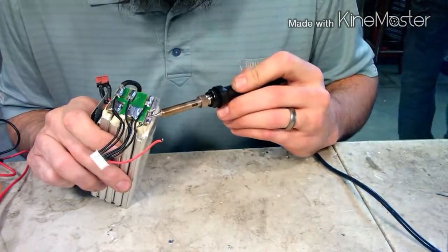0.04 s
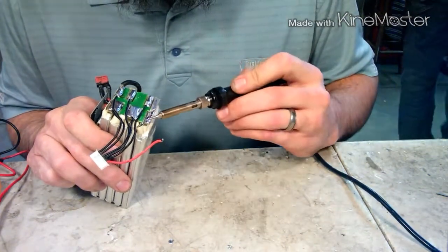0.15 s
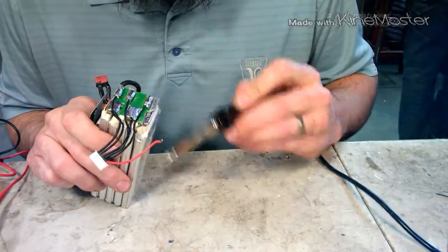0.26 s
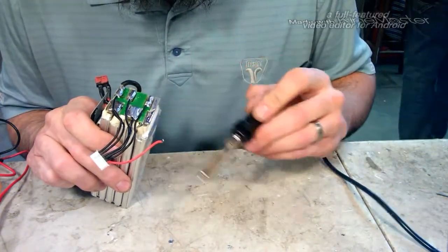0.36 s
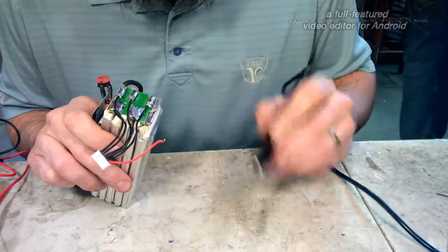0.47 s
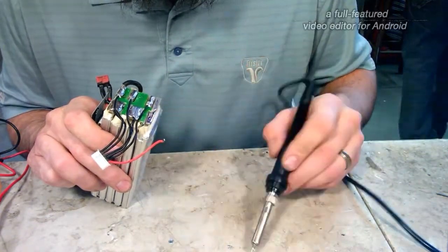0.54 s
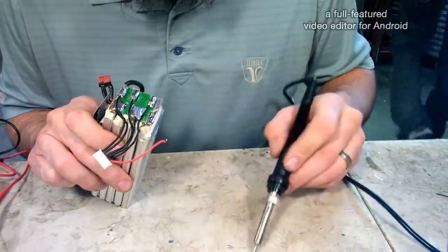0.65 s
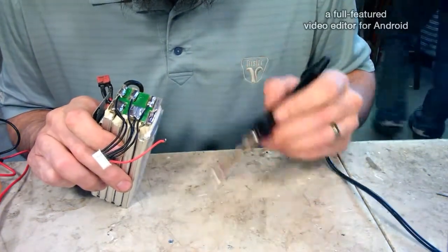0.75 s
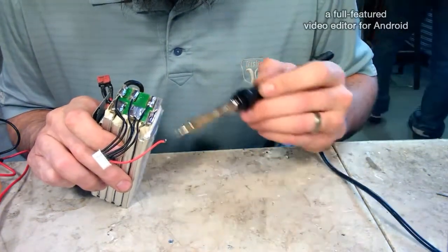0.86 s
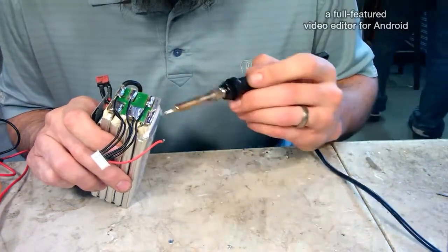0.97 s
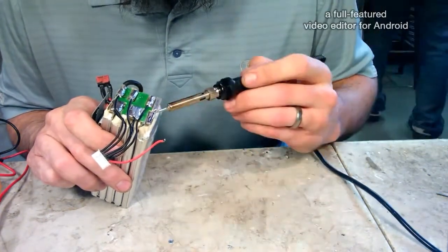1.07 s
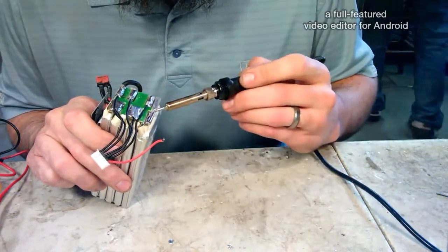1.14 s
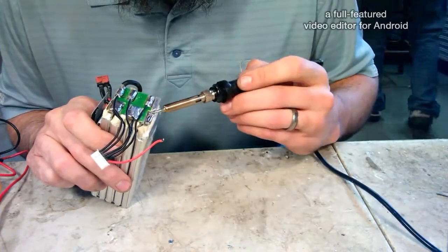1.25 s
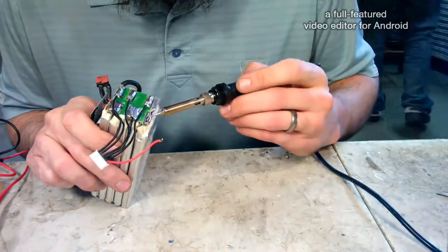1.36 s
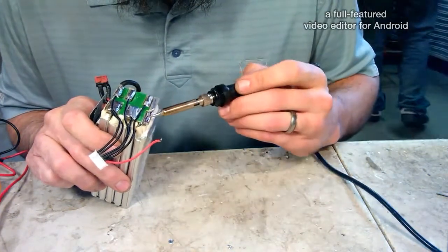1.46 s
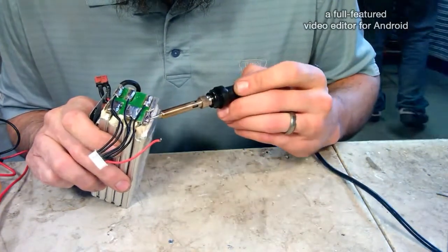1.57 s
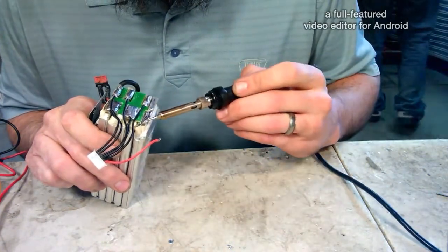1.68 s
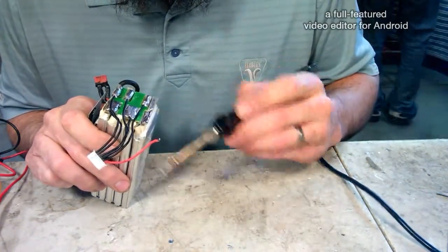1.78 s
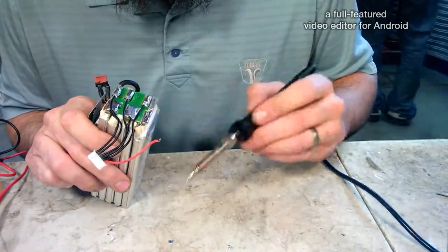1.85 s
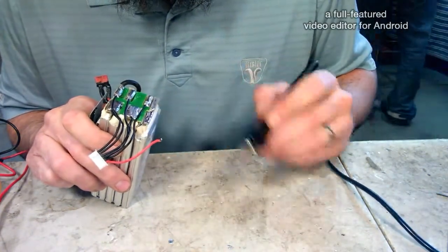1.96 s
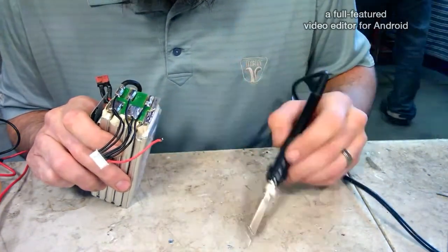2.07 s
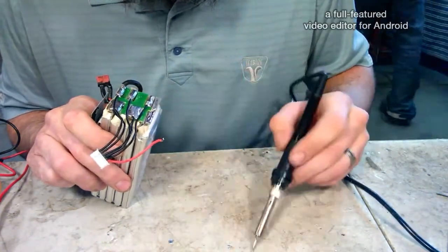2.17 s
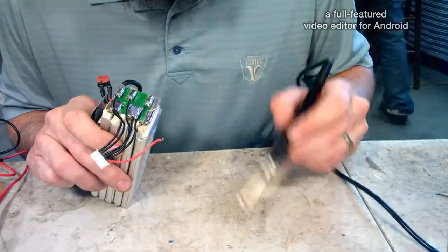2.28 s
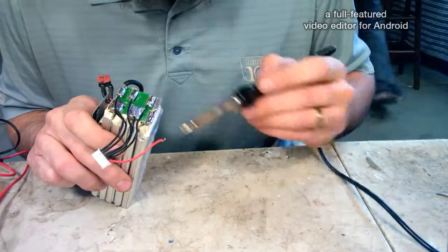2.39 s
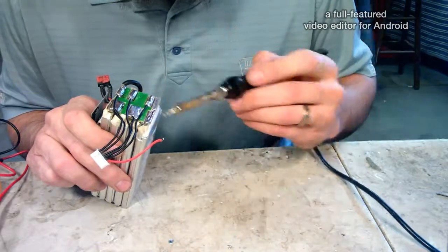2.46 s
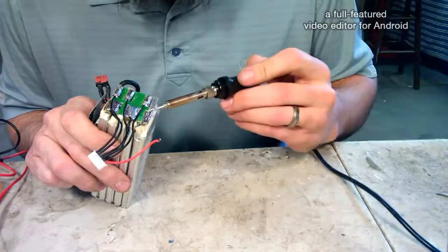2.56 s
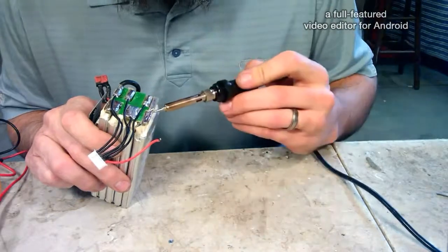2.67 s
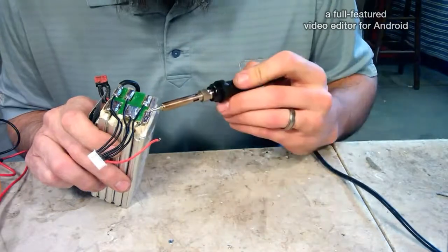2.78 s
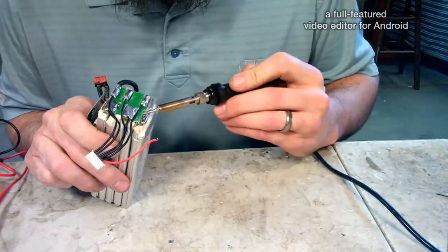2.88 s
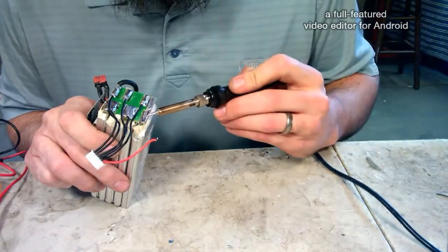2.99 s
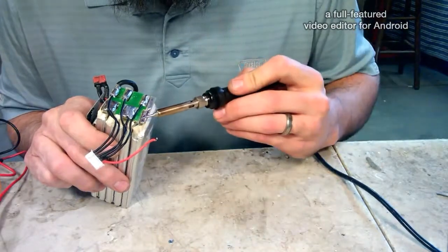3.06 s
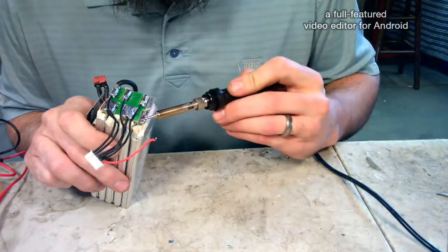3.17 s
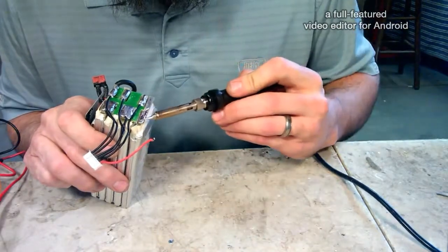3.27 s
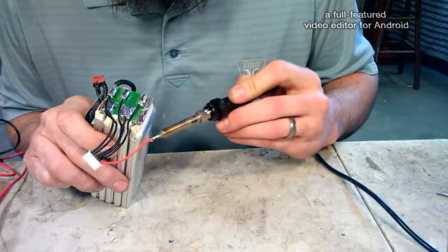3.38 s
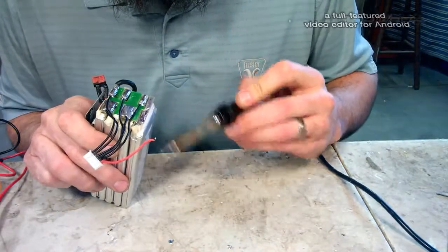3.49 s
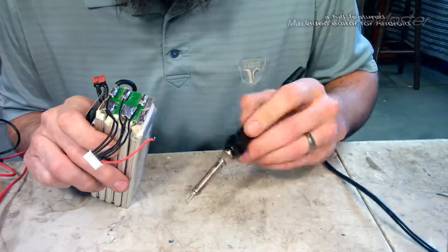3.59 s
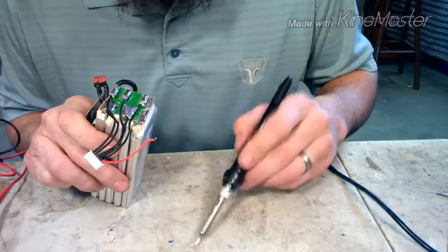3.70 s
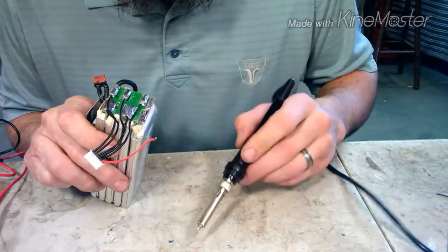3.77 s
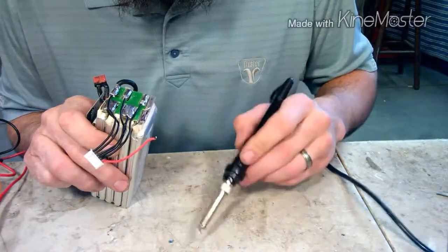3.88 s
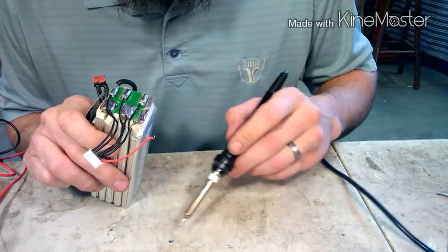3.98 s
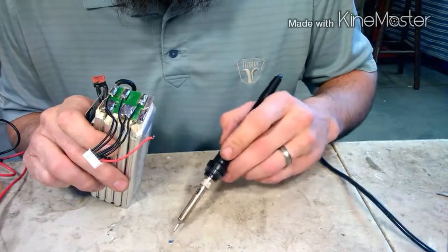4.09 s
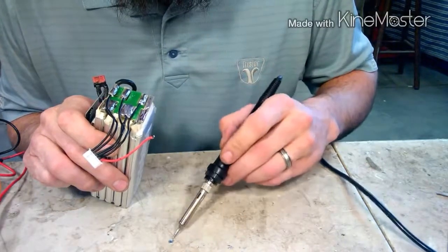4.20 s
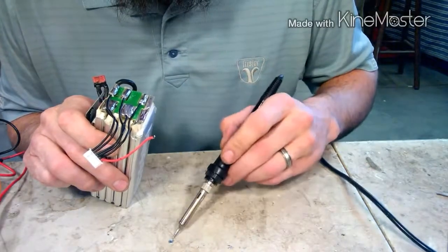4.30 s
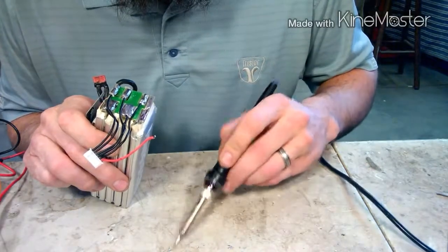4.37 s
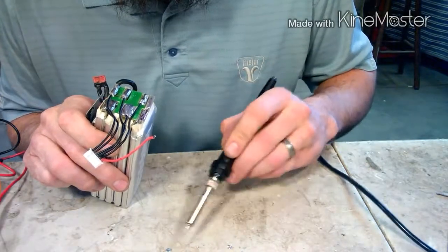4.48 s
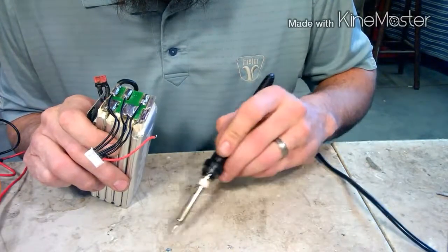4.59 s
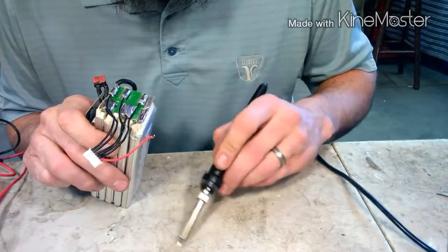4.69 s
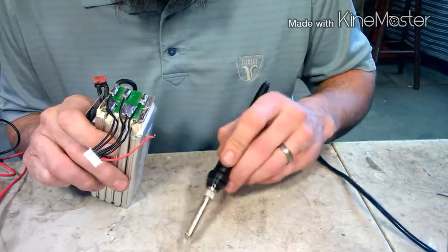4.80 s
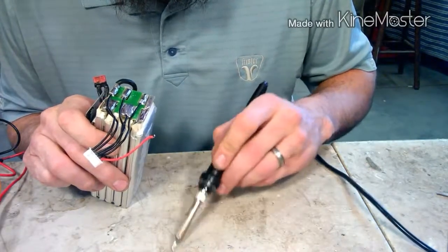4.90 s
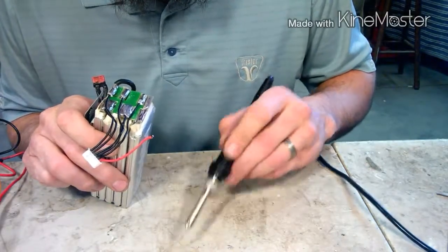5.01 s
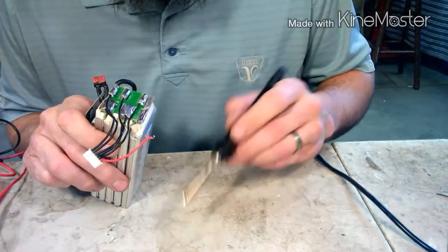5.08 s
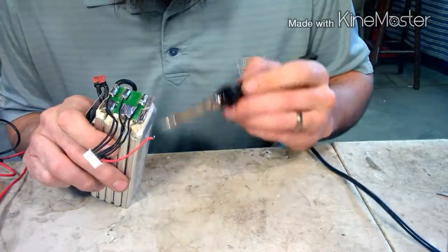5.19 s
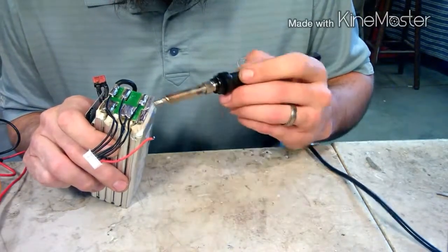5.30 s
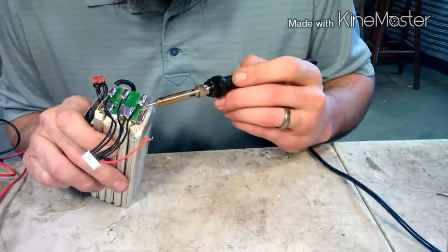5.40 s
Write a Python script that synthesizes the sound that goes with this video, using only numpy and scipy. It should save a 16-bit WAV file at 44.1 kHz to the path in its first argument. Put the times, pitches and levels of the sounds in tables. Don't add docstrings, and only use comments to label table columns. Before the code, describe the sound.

A soldering iron is knocked on a wooden bench close to a phone. A sharp double clack comes first, then after a pause a rapid run of hard raps, a faint tick, another loud cluster, and finally smaller knocks and scuffs. Low ventilation rumble with soft hiss fills a small, dry workshop, ducking briefly after the loudest hits.

```python
import sys
import numpy as np
from scipy import signal
from scipy.fft import rfft, irfft, next_fast_len
from scipy.io import wavfile
from scipy.ndimage import uniform_filter1d, map_coordinates

SR = 44100
rng = np.random.default_rng(int(sys.argv[2]) if len(sys.argv) > 2 else 0)


def transcribe(u):
    v = np.clip(np.atleast_2d(u).T, -1, 1)
    q = np.round(v * 32767).astype(np.int16)
    wavfile.write(sys.argv[1], SR, q)


def elevation(decibels):
    levels = np.asarray(decibels, float)
    return 10 ** (levels / 20)


N = 240256

# (frequency [Hz], density [dB per Hz])
AIR_SPECTRUM = [(25, -14), (50, -10), (85, 2.5), (180, -3.5), (300, -0.5), (400, -7), (520, -10.5),
                (900, -16), (1400, -24.5), (2000, -27.5), (3500, -31.5), (5500, -34), (9000, -35.5),
                (15000, -44)]
# (frequency [Hz], level [dB])
AIR_FAR_LEVEL = [(40, -10), (150, -8), (300, -10.5), (600, -4), (1200, -3), (2650, -.6), (5300, -.8),
                 (9000, -10.5), (15000, -16)]
# (frequency [Hz], signed likeness [-1 to 1])
AIR_COHERENCE = [(30, 0.79), (70, 0.49), (150, 0.84), (300, 0.39), (600, 0.99), (1200, 0.35), (1900, -0.22),
                 (2650, 0.28), (3600, 0.15), (5300, -0.22), (7000, 0.13)]
# (frequency [Hz], phase [rad])
AIR_PHASE_LEAD = [(45, 1), (120, 0.6), (300, -1.5), (600, -0.86)]
# (frequency [Hz], width [Hz], level [dB])
DUCT_DRONE = (178, 30.5, 0)
# (frequency [Hz], width [Hz], level [dB])
BENCH_HOLLOW = [(321.6, 5.5, 9.5), (520, 50, -3.5), (900, 73, -1.5)]
# (time [s], load [dB])
FAN_LOAD = [(0, 0), (.4, 1), (.8, -1.5), (1.15, -1), (1.5, 0.5), (1.9, 1), (2.4, 0), (2.8, -1), (3.3, 0),
            (3.8, -0.5), (4.2, 0.5), (4.6, -1), (5, -0.5), (5.45, -0.5)]
# (frequency [Hz], slope [dB per dB])
LOAD_RESPONSE = [(60, .7), (180, 1.1), (350, 1.1), (600, 0.2)]

# (frequency [Hz], t60 [s])
ROOM_T60 = [(200, 0.17), (1000, 0.1), (8000, 0.033)]

# (frequency [Hz], width [Hz], level [dB])
BENCH_MODES = [(437, 60, 3), (595, 90, 3), (780, 130, -3), (1030, 220, -7)]
# (frequency [Hz], width [Hz], level [dB])
UPPER_MODES = [(1180, 150, -9), (1294, 85, -12), (1530, 90, -1.5), (2000, 110, -10)]
# (frequency [Hz], width [Hz])
THUD_MODE = (200, 130)
# (frequency [Hz], width [Hz], level [dB])
DEAD_WOOD = (560, 800, -5)
# (frequency [Hz], level [dB])
BENCH_FAR_LEVEL = [(150, 1), (400, -3), (700, 2), (2500, -4), (5000, 0), (9000, -11), (15000, -17)]

# (time [s], ring level [dB], crack level [dB])
RINGS = [(0.4494, -52, -22.5), (0.456, -60, -25), (2.0454, -28, -19.5), (2.1165, -30, -22),
         (2.121, -40, -24.5), (2.196, -57, -28), (3.664, -29, -35), (3.666, -45, -29), (3.762, -43, -23),
         (3.767, -50, -27), (4.324, -55, -29), (4.864, -60, -46)]
# (frequency [Hz], t60 [s])
BARREL_MODE = (8770, 0.024)
# (frequency [Hz], level [dB])
TIP_SPECTRUM = [(1500, -18), (2400, 15), (3300, 16.5), (4200, 5), (5500, -3.5), (7000, -14), (10500, -3),
                (15000, -26)]

# (time [s], peak [dB], thud [dB], upper modes [dB], snap [dB])
HARD_BLOWS = [(.4477, -16, -28, -11, -22), (.4489, -13, -28, -18, -22), (.4506, -13.5, 4, -12, -16),
              (.4568, -27, 12, -20, -12), (.4595, -19, 1, -15, -20), (.5178, -22, -12, -20, -24),
              (.5231, -24, -28, -14, -22), (.5268, -24, -28, -25, -24), (.5359, -28, -2, -13, -24),
              (1.9689, -14.5, -10, -13, -28), (1.9808, -19, -20, -13, -26), (2.0414, -12.5, -28, -25, -34),
              (2.0431, -24, 13, 0, -12), (2.0453, -9.5, -28, -28, -30), (2.0463, -7.7, -28, -28, -22),
              (2.1134, -14, -8, -15, -26), (2.1151, -7.6, -17, -28, -32), (2.1163, -8.2, -7, -20, -26),
              (2.118, -11.5, 3, -20, -18), (2.1918, -21.5, 0, -25, -26), (2.1935, -17.5, -10, -28, -28),
              (2.1946, -17, -8, -21, -26), (2.1964, -17.5, 2, -18, -24), (2.204, -21, -19, -15, -28),
              (3.6585, -12.7, -9, -28, -32), (3.6602, -12.8, -28, -5, -28), (3.6615, -14, -4, -8, -16),
              (3.6632, -8, -4, -28, -17), (3.665, -11.8, -4, -28, -13), (3.6673, -28, -20, 12, -4),
              (3.762, -14, 1, -14, -18), (3.7648, -15.5, -6, -14, -19), (4.1062, -18.3, -5, -14, -30),
              (4.1114, -23, 5, -24, -28), (4.3228, -9.5, -14, -17, -34), (4.3257, -18, -2, -7, -26),
              (4.3274, -17.5, -12, -10, -28), (4.6645, -21, -20, 0, -26), (4.8635, -19, -14, -4, -24)]
# (frequency [Hz], level [dB])
SNAP_SPECTRUM = [(1300, 13.5), (1750, 5.5), (2600, 8), (3500, -3), (6000, -7), (9000, -6), (12000, -11),
                 (15000, -18)]

# (time [s], peak [dB], contact spread [s], thud [dB], upper modes [dB])
CHATTERS = [(0.453, -31, 0.0074, -12, -11), (0.464, -13, 0.008, -15, -11), (0.521, -22, 0.0062, -27, -5.5),
            (.531, -24, .007, -22, -20), (1.972, -24, 0.0093, -6, -26), (1.983, -21, 0.011, -12, -13),
            (2.05, -27, 0.0052, 6, -19), (2.124, -23, 0.01, -10, -30), (2.199, -20, 0.0062, -15, -30),
            (2.205, -36, 0.0089, 2, -32), (2.917, -18, 0.0023, -20, -24), (3.663, -24, .004, -11, 0),
            (3.671, -17, 0.005, -11, -21), (3.679, -25, 0.0055, -11, -18), (3.768, -23.5, 0.0063, -14, -16),
            (4.108, -27, 0.007, 13, -24), (4.115, -23.5, 0.0069, 7, -27), (4.331, -21, 0.01, -3, -8),
            (4.6255, -16.5, 0.01, -5, -20), (4.639, -18.5, 0.017, -10, -28), (4.666, -17.5, 0.007, -23, -4),
            (4.671, -26, 0.0034, -21, -21), (4.866, -25, 0.0035, -9, -6), (4.8672, -19, 0.011, -8, -19),
            (4.882, -15, 0.0052, -4, -8.5), (4.889, -13.5, 0.0052, -11, -6), (4.898, -20, .008, -12, -18)]
# (frequency [Hz], level [dB])
RASP_SPECTRUM = [(1200, 11.5), (1700, 6), (2200, -1), (3400, -1.5), (5000, -16), (7000, -19), (9500, -18),
                 (12000, -20), (15000, -21)]

# (time [s], cut [dB])
GAIN_REDUCTIONS = [
    (0.454, 9.5),
    (.525, 8),
    (1.974, 7),
    (2.046, 5.5),
    (2.118, 5),
    (2.2, 2),
    (3.663, 5),
    (3.765, 4.5),
    (4.33, 0),
    (4.669, -2),
]
# (frequency [Hz], amplitude share [0 to 1])
CROSS_FEED = [(500, 0.0062), (1200, 0.5), (2650, 0.59), (3900, 0.35), (5300, 0.27), (8000, 0.31),
              (15000, 0.013)]
# (frequency [Hz], level [dB])
BAND_EDGE = [(14500, 0), (15050, 2), (15550, -16), (15650, -58)]


def unit(x):
    return x / np.sqrt(np.mean(x ** 2) + 1e-20)


def peak1(x):
    return x / np.abs(x).max()


def along(points, hz):
    f, v = np.transpose(points)
    return np.interp(np.log(hz + 1), np.log(f + 1), v)


def filtered(x, response):
    n = x.shape[-1]
    m = next_fast_len(n + 8192)
    return irfft(rfft(x, m) * response(np.fft.rfftfreq(m, 1 / SR)), m)[..., :n]


def shaped(x, spectrum):
    return filtered(x, lambda f: elevation(along(spectrum, f)))


def mode(f, hz, width_hz):
    return 1j * f * width_hz / (hz * hz - f * f + 1j * f * width_hz)


def modes(f, table, scatter):
    total = 0
    for k, ((hz, width_hz, db), (db_shift, detune)) in enumerate(zip(table, scatter)):
        total = total + (-1) ** k * elevation(db + db_shift) * mode(f, hz * (1 + .006 * detune), width_hz)
    return total


def wobble(rate):
    knots = rng.standard_normal(int(N * rate / SR) + 4)
    return map_coordinates(knots, [np.arange(N) * rate / SR])


def gain_db():
    attack_s, hold_s, return_db_per_s = 0.027, 0.099, 14.5
    s, cut_db = np.transpose(GAIN_REDUCTIONS)[:, :, None]
    late = np.clip(np.arange(N) / SR - s, 0, None)
    recovered_db = return_db_per_s * np.clip(late - hold_s, 0, None)
    left_db = np.clip(cut_db - recovered_db, 0, None)
    return -(left_db * (1 - np.exp(-late / attack_s))).max(axis=0)


def ventilation():
    level_db, patchy_db = -24, 1.0
    z = signal.stft(rng.standard_normal((2, N + 512)), nperseg=512)[2]
    patches = uniform_filter1d(rng.standard_normal(z.shape[1:]), size=5, axis=0)
    patches = uniform_filter1d(patches, size=10, axis=1)
    load_db = np.interp(np.arange(z.shape[2]) * 256 / SR, *np.transpose(FAN_LOAD))
    heave_db = along(LOAD_RESPONSE, np.fft.rfftfreq(512, 1 / SR))[:, None] * load_db
    own, near = signal.istft(z * elevation(patchy_db * unit(patches) + heave_db), nperseg=512)[1][:, :N]

    def coherence(hz):
        return np.clip(along(AIR_COHERENCE, hz), -.99, .99)

    def hollow(hz):
        return 1 + sum(elevation(db) * mode(hz, c, w) for c, w, db in BENCH_HOLLOW)

    def duct(hz):
        return 1 + elevation(DUCT_DRONE[2]) * mode(hz, *DUCT_DRONE[:2])

    common = filtered(near, lambda hz: coherence(hz) * np.exp(1j * along(AIR_PHASE_LEAD, hz)))
    separate = filtered(own, lambda hz: np.sqrt(1 - coherence(hz) ** 2))
    far = filtered(common + separate, lambda hz: elevation(along(AIR_FAR_LEVEL, hz)) * hollow(hz))
    pair = filtered(np.array([far, near]), lambda hz: elevation(along(AIR_SPECTRUM, hz)) * duct(hz))
    return elevation(level_db + 0.18 * wobble(9.7)) * pair / np.std(pair[1])


def room(x):
    wet_db = -14
    hz, t, z = signal.stft(rng.standard_normal((2, SR // 2)), SR, nperseg=256)
    decay = elevation(-60 * t / along(ROOM_T60, hz)[:, None])
    tail = signal.istft(z * decay, SR, nperseg=256)[1]
    delayed = np.pad(x, ((0, 0), (250, 0)))
    return elevation(wet_db) * signal.fftconvolve(delayed, tail / np.linalg.norm(tail[0]), axes=1)[:, :N]


def far_shade(out):
    delay_s = 0.000085
    left = filtered(out[0], lambda hz: elevation(along(BENCH_FAR_LEVEL, hz)) * np.exp(-2j * np.pi * hz * delay_s))
    return np.array([left, out[1]])[:, :N]


def barrel():
    out, t = np.zeros((2, N + SR)), np.arange(SR // 10) / SR
    hz, ring_t60 = BARREL_MODE
    tip_t60 = 0.013
    ring_envelope = (1 - np.exp(-t / 0.0043)) * elevation(-60 * np.clip(t - .004, 0, None) / ring_t60)
    ring = ring_envelope * np.sin(2 * np.pi * hz * t)
    port_gain = elevation([[-12.5], [.1]])
    for s, db, crack_db in RINGS:
        tip = shaped(rng.standard_normal(len(t)), TIP_SPECTRUM)
        crack = peak1(tip * (1 - np.exp(-t / 0.0011)) * elevation(-60 * t / tip_t60))
        out[:, round(s * SR):][:, :len(t)] += elevation(db + 0.5) * ring * port_gain + elevation(crack_db) * crack
    return out[:, :N]


def bench_parts(push, tone):
    body = peak1(filtered(push, lambda f: modes(f, BENCH_MODES, tone)))
    upper = peak1(filtered(push, lambda f: modes(f, UPPER_MODES, tone[::-1])))
    thud = peak1(filtered(push, lambda f: mode(f, *THUD_MODE)))
    board = peak1(filtered(push, lambda f: mode(f, *DEAD_WOOD[:2])))
    return body, upper, thud, board


def blows():
    snap_gain_db, snap_t60 = 9.0, 0.036
    push_s, blunt_s = .0005, .00022
    out, t, gain = np.zeros((2, N + SR)), np.arange(SR // 10) / SR, gain_db()
    push = -np.exp(-((t - push_s) / blunt_s) ** 2)
    snap_envelope = (1 - np.exp(-t / 0.0012)) * elevation(-60 * t / snap_t60)
    for s, db, thud_db, upper_db, snap_db in HARD_BLOWS:
        tone = rng.normal(0, .4, (8, 2))
        body, upper, thud, board = bench_parts(push, tone)
        snap = snap_envelope * unit(shaped(rng.standard_normal((2, len(t))), SNAP_SPECTRUM))
        wood = body + elevation(-9) * board + elevation(upper_db) * upper + elevation(thud_db) * thud
        start = round((s - push_s) * SR)
        level = elevation(db - gain[round(s * SR)])
        out[:, start:start + len(t)] += level * (wood + elevation(snap_db + snap_gain_db) * snap)
    return far_shade(out)


def knocks():
    lead_s, gap_s, blunt_s = 0.00047, .0016, 0.00026
    rebound_db, rebound_s = -9, 0.01
    rasp_db, rasp_harder = -12, 0.06
    out, t, gain = np.zeros((2, N + SR)), np.arange(SR // 5) / SR, gain_db()
    for s, db, spread, thud_db, upper_db in CHATTERS:
        when = gap_s * (np.arange(40) + rng.random(40))
        size = rng.normal(0, 0.53, 40)
        tone = rng.normal(0, 1.5, (8, 2))
        size[0], when[0] = -1.3, .0005
        contact = 1 / (1 + (when / spread) ** 6)
        size = size * (contact + elevation(rebound_db) * np.exp(-when / rebound_s))
        pushes = (size[:, None] * np.exp(-((t - when[:, None]) / blunt_s) ** 2)).sum(axis=0)
        body, upper, thud, board = bench_parts(pushes, tone)
        swell = (1 - np.exp(-t / 0.00073)) * elevation(-60 * np.clip(t - 1.1 * spread, 0, None) / 0.076)
        rasp = swell * unit(shaped(rng.standard_normal((2, len(t))), RASP_SPECTRUM))
        wood = body + elevation(DEAD_WOOD[2]) * board + elevation(upper_db - 2.0) * upper + elevation(thud_db + 1.5) * thud
        sound = wood + elevation(rasp_db + rasp_harder * upper_db) * rasp
        level = elevation(db - 2.74 - gain[round(s * SR)])
        out[:, round((s - lead_s) * SR):][:, :len(t)] += level * sound
    return far_shade(out)


def scene():
    iron = knocks() + blows() + barrel()
    return iron + room(iron) + ventilation()


def top_cut(x):
    return signal.sosfilt(signal.butter(12, 15500, fs=SR, output="sos"), x)


def record(dry):
    cross_s, ceiling, top_hz = 16.75 / 44100, .85, 15700
    cross = filtered(dry[::-1], lambda hz: np.clip(along(CROSS_FEED, hz), 0, .95)
                     * np.exp(-2j * np.pi * hz * cross_s))
    wide = (dry - cross) * elevation(gain_db())
    wide = wide / (1 + np.abs(wide / ceiling) ** 4) ** (1 / 4)
    wide = filtered(wide, lambda hz: elevation(along(BAND_EDGE, hz)) * (hz < top_hz))
    return top_cut(wide)


dry = scene()
out = record(dry)
transcribe(out)
```